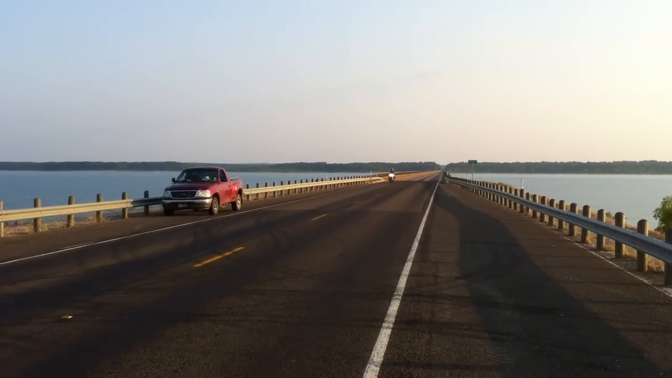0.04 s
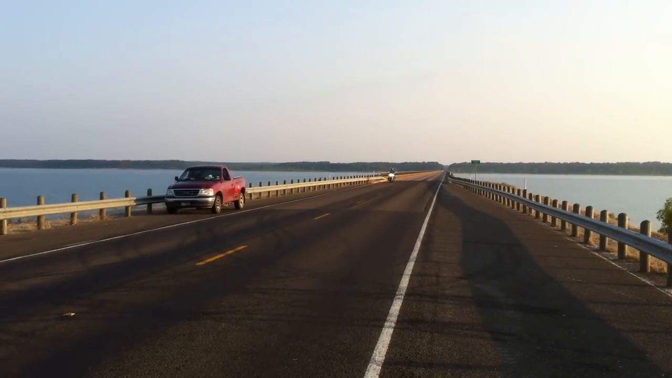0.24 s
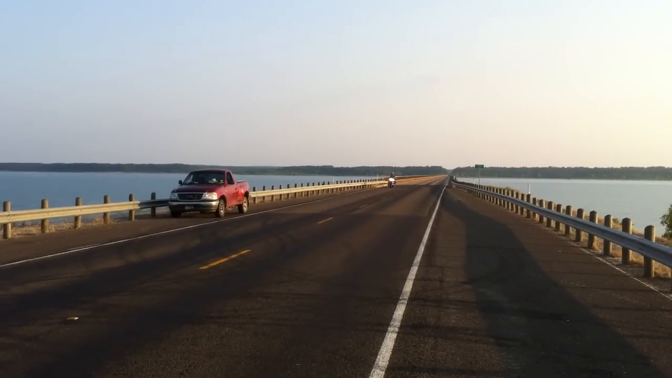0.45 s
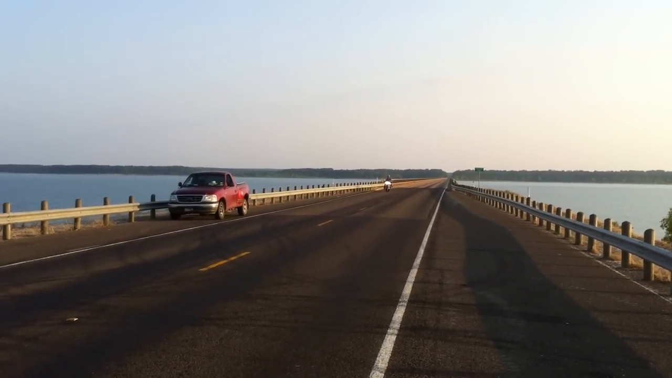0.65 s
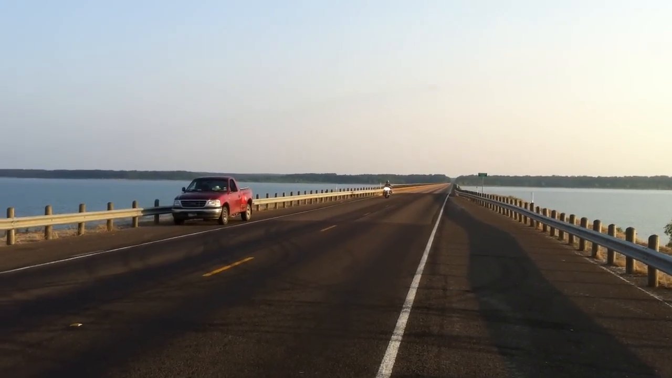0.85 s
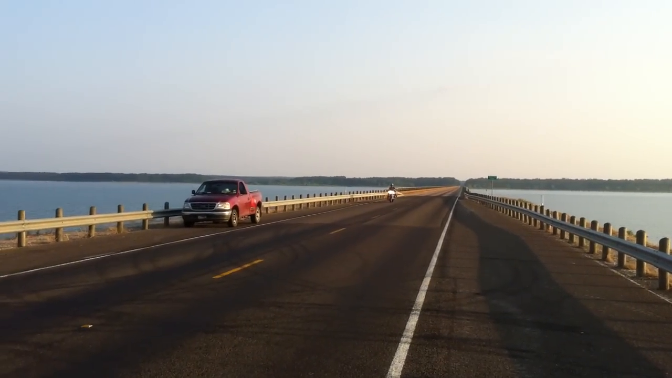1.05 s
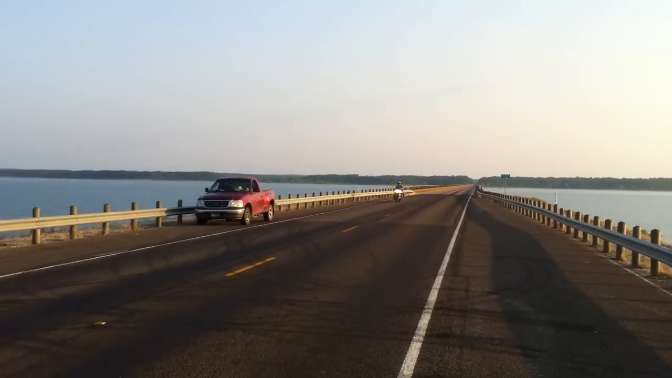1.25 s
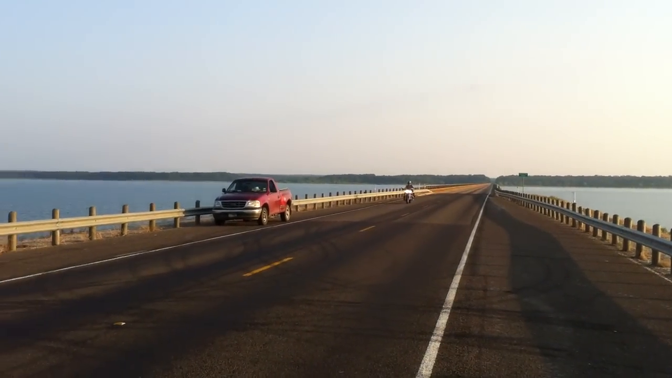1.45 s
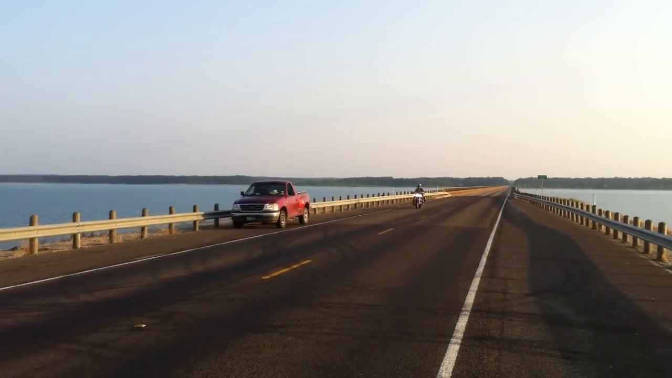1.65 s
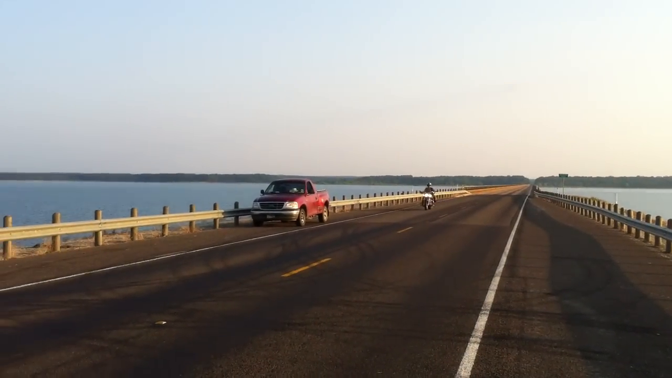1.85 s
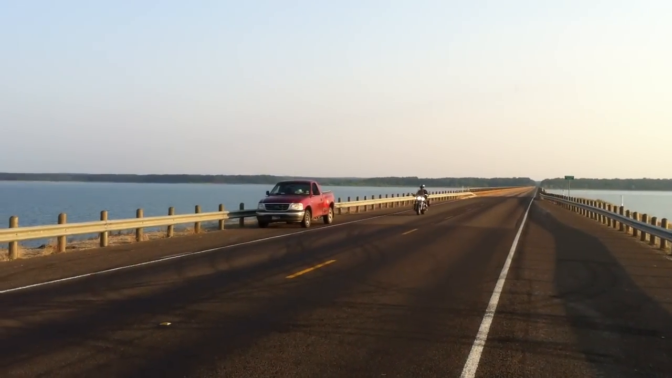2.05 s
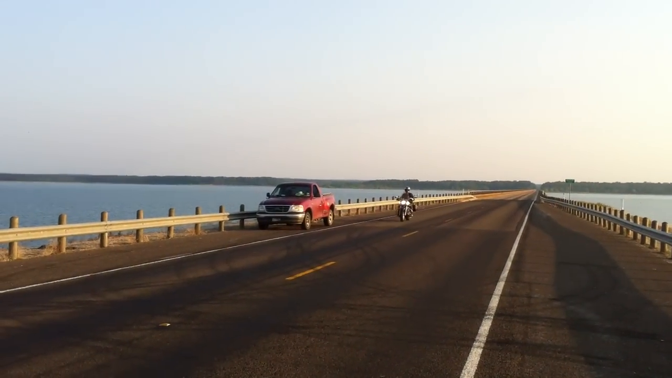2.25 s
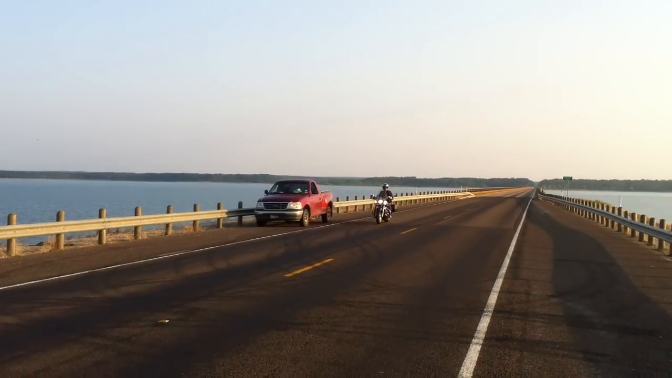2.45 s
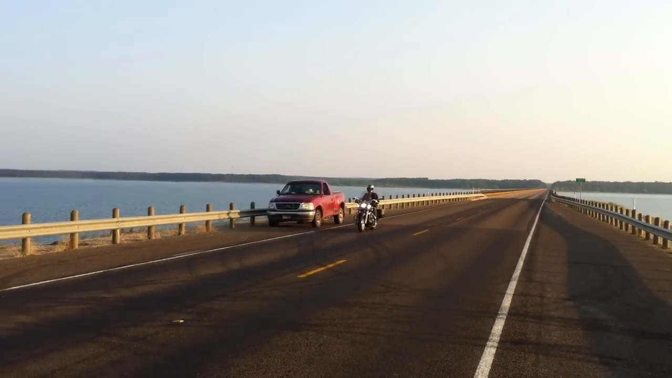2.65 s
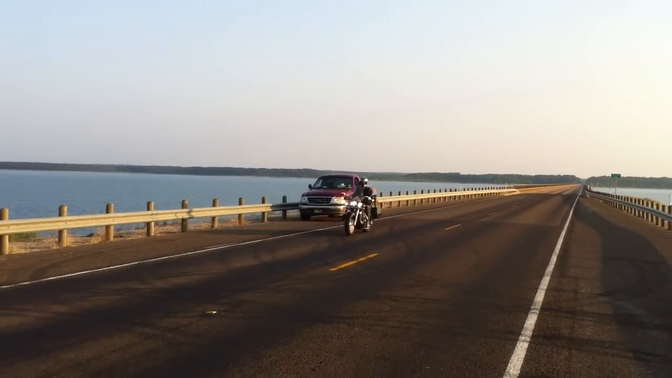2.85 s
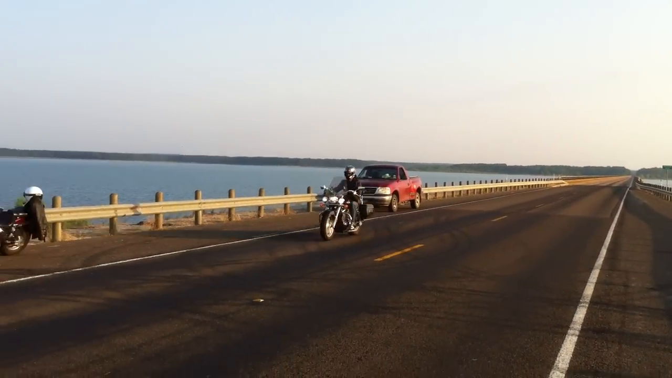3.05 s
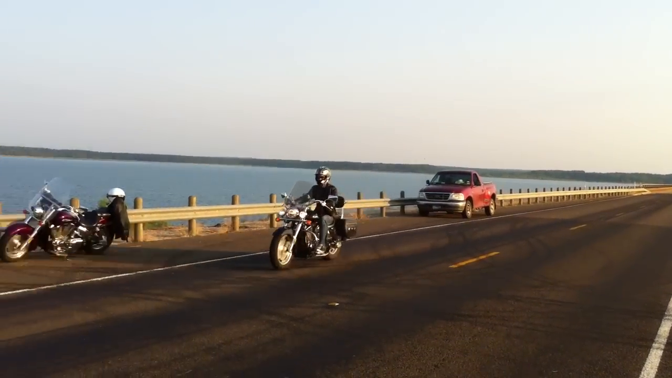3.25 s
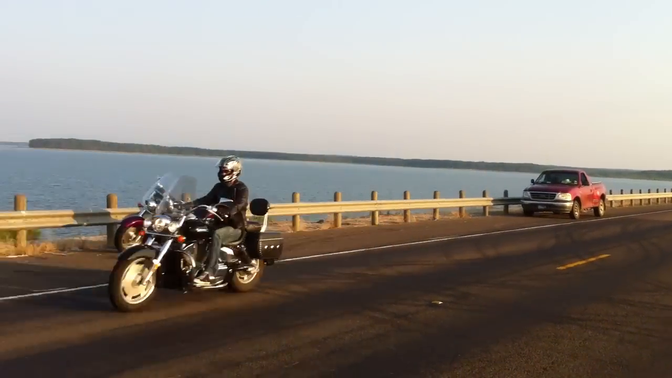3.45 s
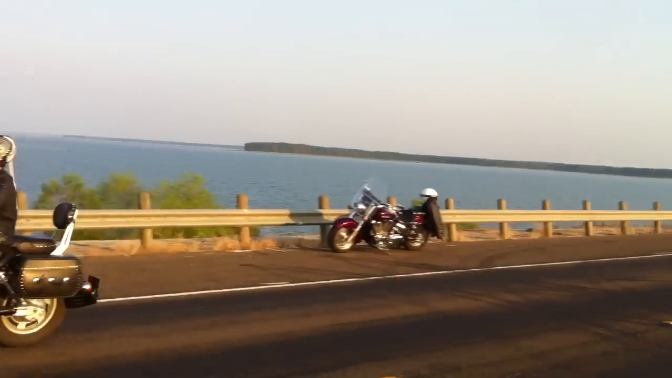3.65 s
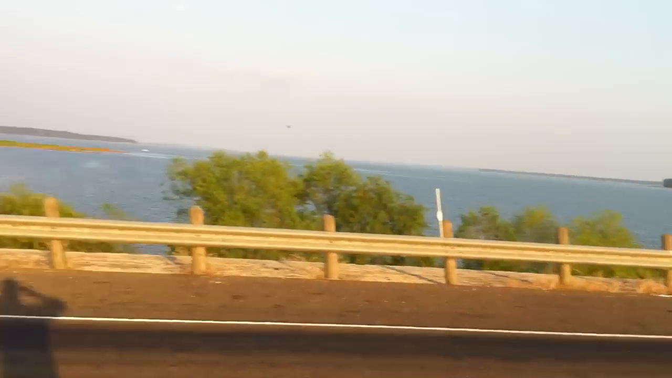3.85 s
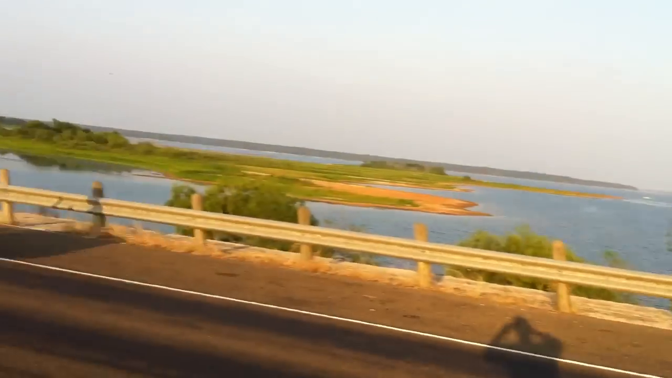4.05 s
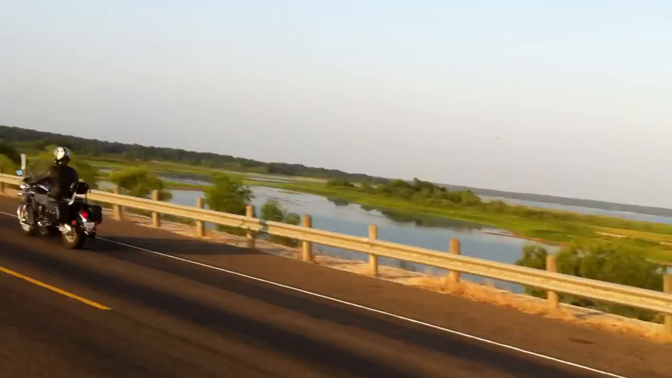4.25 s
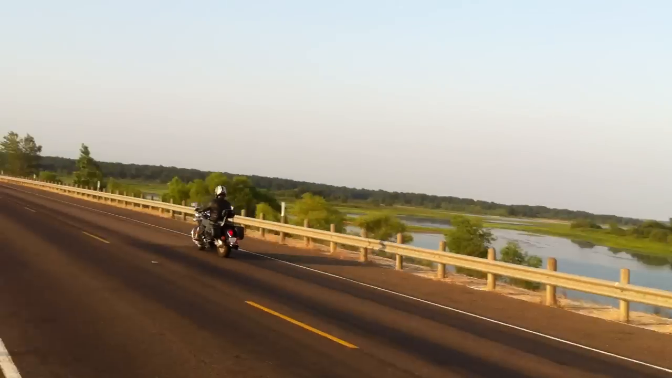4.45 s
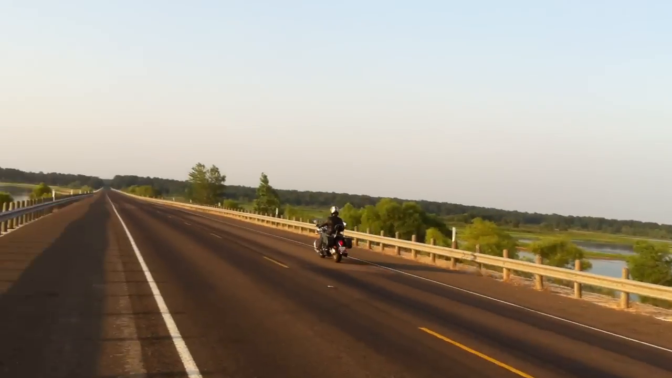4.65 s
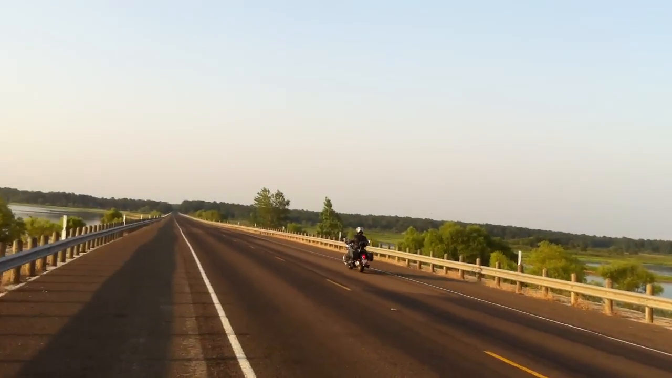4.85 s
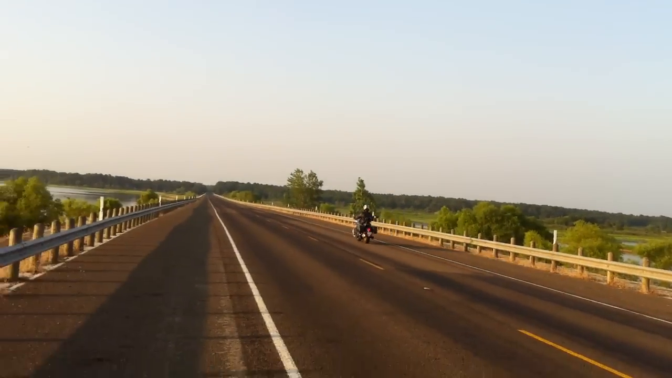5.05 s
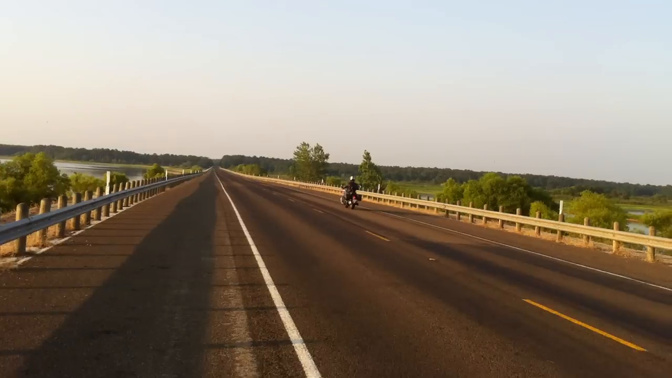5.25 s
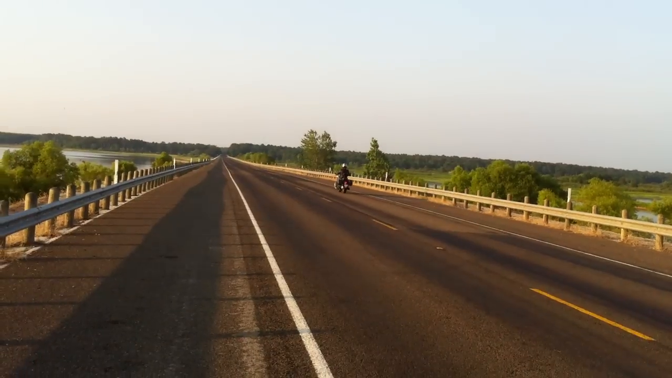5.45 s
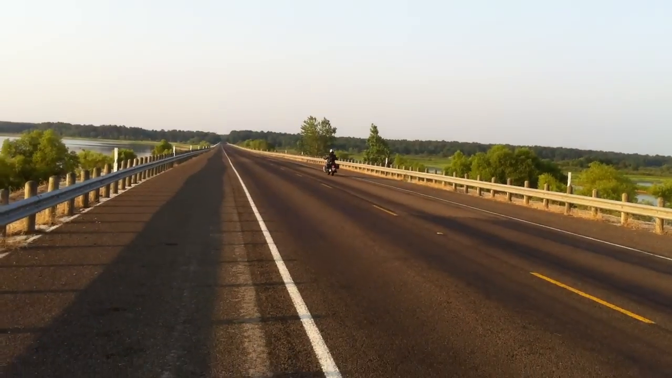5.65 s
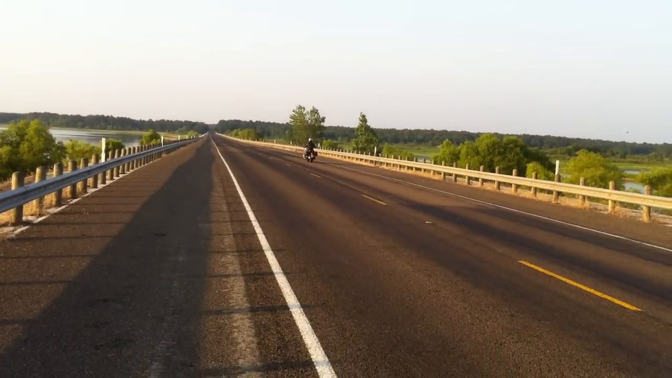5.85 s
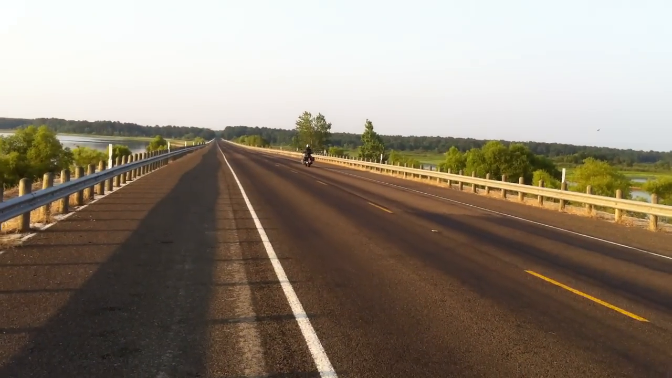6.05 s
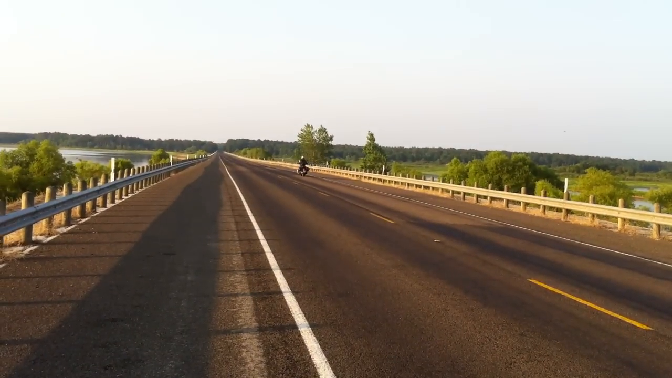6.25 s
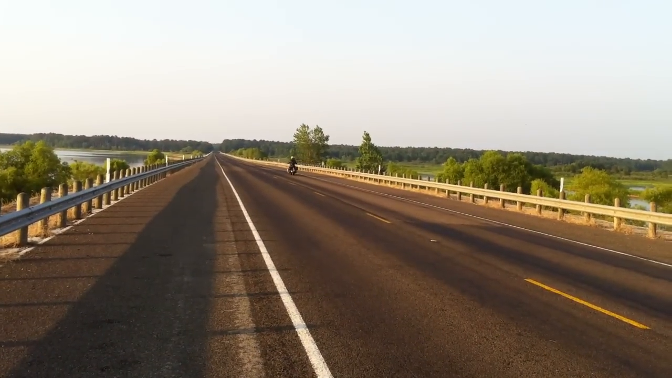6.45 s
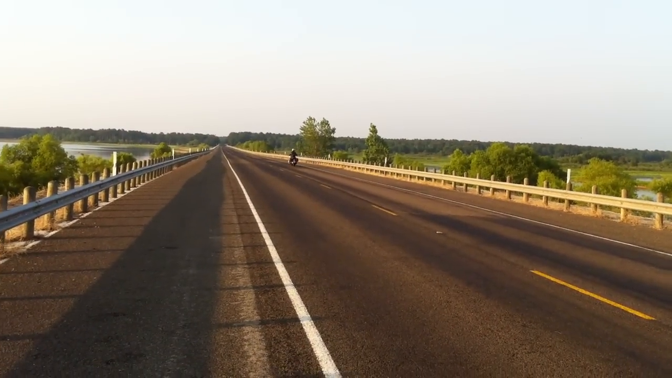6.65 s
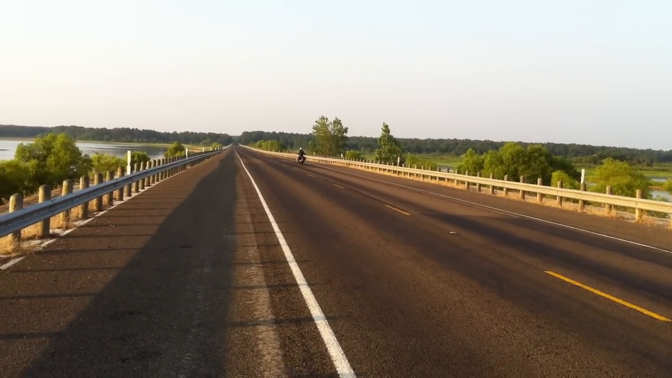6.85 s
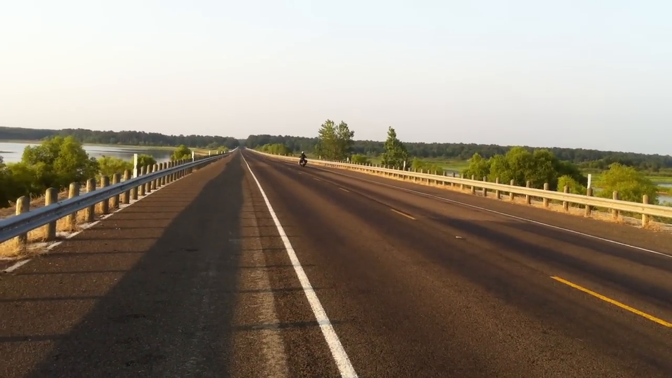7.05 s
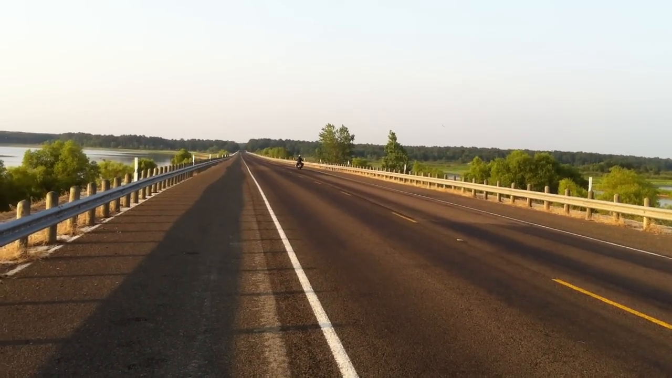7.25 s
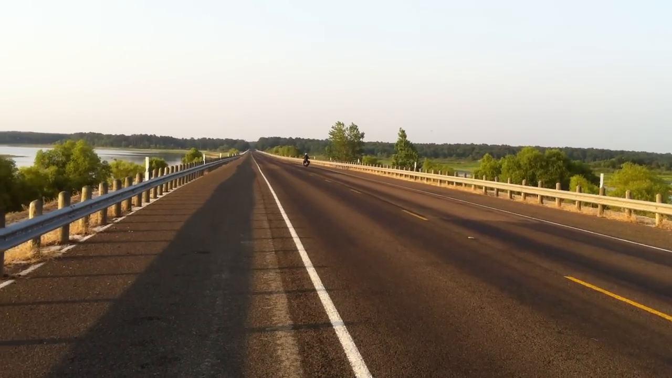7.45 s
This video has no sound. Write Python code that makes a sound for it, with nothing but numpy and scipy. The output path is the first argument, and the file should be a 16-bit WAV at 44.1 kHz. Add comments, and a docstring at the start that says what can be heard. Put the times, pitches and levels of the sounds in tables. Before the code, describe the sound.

A twin-cylinder motorcycle with a loud exhaust approaches on an open road, its uneven throb joined by engine clatter and a building roar. About four seconds in it passes close to the roadside microphone with a brief whine and a rush of tyre hiss, and the pitch drops. It rides away crackling and growling, slowly fading. A light breeze touches the microphone.

```python
"""A V-twin motorcycle with open pipes passes a phone on a causeway at highway speed.
Approach: over a light breeze, two uneven firings a cycle ring two pipes; valves knock, gears rattle,
a rough roar builds. Pass, near 4 s: a brief whine, tyre hiss and a low rumble swell, the pitch drops.
Departure: the pipe mouths face the listener, each firing cracks, a growl trails, the rumble fades.
Guard rails scatter the bike's sound throughout."""
import sys
import numpy as np
from scipy import signal
from scipy.fft import rfft, irfft
from scipy.io import wavfile
from scipy.ndimage import uniform_filter1d, map_coordinates

SR = 44100
rng = np.random.default_rng(int(sys.argv[2]) if len(sys.argv) > 2 else 0)


def unload_wav(signal):
    """Save mono or channel-first audio to the path in sys.argv[1] as 16-bit WAV at rate SR, clipped to [-1, 1]."""
    wavfile.write(
        sys.argv[1],
        SR,
        np.round(np.clip(np.atleast_2d(signal).T, -1, 1) * 32767).astype(np.int16),
    )


N = 330750
TIME = np.arange(N) / SR

# engine speed: t/s, cycle rate/Hz
ENGINE_SPEED = [(0, 25.498), (2.2, 25.586), (5.2, 25.567), (7.5, 25.829)]
# pipe spectra: f/Hz, level/dB of pipe 1 ahead, pipe 2 ahead, pipe 1 behind, pipe 2 behind
PIPE_SPECTRA = [(63.3, -64, -62.5, -47, -54), (108, -28.5, -46, -40, -46.5), (150.2, -8, -2.5, -10, -4.5),
                (160.8, -6, -6.5, -9.5, -11), (179, -17, -19, -16.5, -15.5), (280.3, -11.5, -6, -7.5, -2.5),
                (330.2, -21, -29, -12, -16.5), (431, -27, -26, -25, -15), (475, -40, -27.5, -57.5, -26.5),
                (675, -11.5, -21, -55.5, -31.5), (697, -44.5, -9, -27, -20.5),
                (878, -46.5, -32, -14.5, -45.5), (1120, -50, -36.5, -33.5, -30.5),
                (1660, -52.5, -41.5, -39.5, -30.5)]
# round trip, one row a pipe: delay/s, share
PIPE_ECHO = [(.0064, .58), (.0131, .25)]
# upper pipe modes: f/Hz, width/Hz, level ahead/dB, level behind/dB
PIPE_MODES = [(463, 24.6, -22, -19.5), (583.5, 26, -11, -20), (670, 61, -22, -32), (769.8, 5.7, -19, -11.5),
              (846.4, 11.3, -11.5, -13.5)]
# gain of the boom's upper band: t/s, level/dB
HONK = [(0, 0), (.8, 2), (1.5, -2.5), (2.2, -0.5), (2.6, -2), (2.95, 2), (3.5, 4), (3.76, 2.5), (4.03, 8),
        (4.2, 2.5), (4.4, 2), (7.5, .5)]
# ordinary cracks: t/s, pop level/dB, ring level/dB, snap level/dB
USUAL_CRACKS = [(0, -56, -80, -90), (3.2, -36.5, -43.5, -67), (3.7, -28, -45, -56),
                (3.95, -28, -36.5, -47.5), (4.2, -22, -30, -41.5), (4.5, -29.5, -30.5, -34.5),
                (5.4, -27, -32.5, -34.5), (6.4, -32, -34, -36.5), (6.8, -33.5, -32, -42.5),
                (7.5, -31.5, -41, -41)]
# hardest cracks: t/s, pop level/dB, ring level/dB, snap level/dB, bite f/Hz
HARD_CRACKS = [(3.809, -23, -48, -49, 1900), (4.083, -18.5, -32, -44, 1570), (4.123, -23, -25, -40, 4700),
               (4.164, -21, -27.5, -42, 1710), (4.246, -21.5, -23, -39, 3770),
               (4.287, -23.5, -28, -36, 1770), (4.328, -21, -24.5, -32.5, 1530),
               (4.411, -25.5, -28, -33, 2150), (4.453, -30, -26, -27, 5600), (4.494, -23, -30, -29.5, 1810),
               (4.536, -18.5, -26, -30, 1790), (4.619, -28, -31.5, -29.5, 8250),
               (4.661, -23.5, -26, -27.5, 6850), (4.702, -22, -28.5, -25, 7410),
               (4.744, -22, -35, -37, 1480), (4.786, -26, -18.5, -26, 3730), (4.828, -20.5, -31, -38, 1520),
               (4.953, -24.5, -28, -38, 1620), (5.036, -26, -28, -22.5, 6570), (5.161, -24, -29, -28, 7400),
               (5.495, -25, -25.5, -25.5, 6760), (5.579, -21, -36, -32.5, 1490),
               (5.621, -22.5, -41, -28, 7600), (5.662, -22, -37, -29, 1490), (5.746, -23.5, -38, -36, 1410),
               (5.871, -39, -24.5, -31, 3790), (5.912, -32, -27, -39, 3660),
               (6.079, -27.5, -29.5, -34, 1440), (6.246, -28.5, -28.5, -34, 3520),
               (6.329, -26.5, -25.5, -33, 4090), (6.454, -29, -26, -38, 3700),
               (6.495, -31, -29.5, -40, 4380), (6.537, -26.5, -29, -48, 3900),
               (6.578, -31, -23.5, -39, 3680), (6.703, -26, -29, -32, 3950), (6.744, -30, -27.5, -33, 3820),
               (6.786, -29, -24.5, -36, 3680), (6.827, -26, -23.5, -40, 3700),
               (6.869, -28, -24.5, -33.5, 3750), (6.91, -27.5, -29, -37, 3470),
               (6.952, -30, -29, -38, 4550), (7.159, -30.5, -29, -36, 3350)]
# spectra of pop, ring and snap, each: f/Hz, level/dB
CRACK_SPECTRA = [
    [(500, -7.5), (1000, 6.5), (1500, 9), (2200, 5), (2900, -8), (4000, -21), (8000, -51)],
    [(1500, -34), (2800, -9.5), (3700, 6.5), (4800, -4), (5600, -20), (8000, -37)],
    [(3500, -30), (5500, -8.5), (6600, 5.5), (8000, 2.5), (9300, -13), (11000, -4), (12600, -13.5),
     (13700, -6), (16000, -13)],
]
# piston and valve knocks: phase/cycles, level/dB
KNOCKS = [(.02, -1), (.13, 4), (.43, -5), (.49, -3), (.61, -5), (.75, 0)]
# engine case ring: f/Hz, level ahead/dB, level abreast/dB, level behind/dB
CASE_SPECTRA = [(200, -28, -23, -23), (472, -6, -7.5, -4.5), (680, 6, 1, -3.5), (953, 3.5, -9.5, 4.5),
                (1086, -1, -1, -3), (1196, -12, 7, 4), (1320, 4, -8.5, -1), (1590, -2, -1, 1.5),
                (1790, -2, 3, -7), (1890, -16, -2.5, -6.5), (2135, -3, -7.5, -13.5), (2357, -5.5, -8, -7),
                (2610, -17.5, -6, -29), (2700, -13, -16.5, -15), (3220, -21.5, -26, -22.5),
                (3420, -12, -18, -13), (3940, -38, -24, -16.5), (7000, -40.5, -48, -59.5)]
# roar of the approach: t/s, f/Hz, level/dB
ROAR = [(2.45, 890, -47), (2.57, 880, -31), (2.75, 760, -32), (3.15, 730, -27.5), (3.45, 835, -31.5),
        (3.72, 790, -28.5), (3.82, 820, -37), (4.0, 810, -30), (4.17, 750, -38)]
# whine of the engine's flank: t/s, f/Hz, level/dB
WHINE = [(3.1, 2340, -40), (3.68, 2180, -43), (3.8, 1970, -28), (3.88, 1940, -40), (4.1, 1870, -38)]
# growl of the pipe mouths: t/s, f/Hz, level/dB
GROWL = [(3.8, 1010, -40), (3.92, 950, -26.5), (4.06, 944, -30.5), (4.15, 940, -42), (4.45, 923, -32),
         (5.35, 887, -31.5), (6.11, 872, -38.5), (6.25, 850, -31.5), (6.7, 878, -39.5), (7.5, 872, -35)]
# tyre and air hiss along the road: f/Hz, level/dB
HISS_AXIAL = [(3100, 3.5), (3700, 8.5), (4700, -5), (5600, -5.5), (6600, 1), (8200, -13), (9600, -9.5),
              (11000, -18), (11800, -42), (15500, -19)]
# whoosh abreast: f/Hz, level/dB
HISS_SIDE = [(1200, 5.5), (2400, 1), (3800, 2), (5500, -4), (6700, -7), (8200, -6.5), (9900, -11),
             (11000, -10), (11900, -15), (13000, -16)]
# rail scatter, long waves bend round the posts: f/Hz, level/dB
RAIL_SPECTRUM = [(100, -12), (300, 2), (600, 12.5), (2500, 4), (4000, 4), (6500, -1), (14000, -42)]
# wind on the microphone and low rumble: f/Hz, level/dB
WIND_SPECTRUM = [(15, -17), (30, -38), (60, -5), (100, 4), (160, -11), (400, -38), (1500, -81)]
# puffs on the microphone: t/s, level/dB
PUFFS = [(.77, -52), (1.1, -50), (1.5, -46), (2.1, -49), (2.27, -52), (3.31, -49), (3.46, -52), (3.77, -54)]
# open air: f/Hz, level/dB
AIR_SPECTRUM = [(100, -10), (1000, -3), (4000, -10), (8000, -16.5), (16000, -33.5)]

# settings for carry_db(); losses per doubling of distance, negative if beamed down the road
BOOM = dict(ahead_db=-9, behind_db=-16, ahead_loss_db=9, behind_loss_db=2.5, broadside_db=1.16)
BARK = dict(ahead_db=-18, behind_db=-32.5, ahead_loss_db=9.5, behind_loss_db=-1.5, broadside_db=11)
CLATTER = dict(ahead_db=-26.5, behind_db=-28.5, ahead_loss_db=7, behind_loss_db=5, broadside_db=2.5)
HISS = dict(ahead_db=-25, behind_db=-34.5, ahead_loss_db=20, behind_loss_db=24, broadside_db=10)

CYCLE_HZ, FIRING_PHASES = 25.7, (0, .403)
SPEED_M_S, PASS_S, LANE_M, SOUND_M_S = 23.74, 3.9515, 6.01, 343


def firings(phase, scatter_db=.5, jitter_s=.00003, count=200):
    """One cylinder's pulses in the bike's own time, slightly uneven."""
    chance = rng.standard_normal((count, 2))
    at = ((np.arange(count) + phase) / CYCLE_HZ + jitter_s * chance[:, 1]) * SR
    pulses = np.zeros(int((count + 1) / CYCLE_HZ * SR))
    pulses[np.abs(at).astype(int)] = undb(scatter_db * chance[:, 0])
    return pulses


def pipes():
    """Firings echo in two pipes and ring their modes; returns the sound ahead and behind."""
    hz, *spectra_db = np.transpose(PIPE_SPECTRA)
    ahead, behind, drive = 0, 0, 0
    for k, (phase, (delay_s, share)) in enumerate(zip(FIRING_PHASES, PIPE_ECHO)):
        pulses = firings(phase)
        drive = drive + pulses
        echoed = pulses + share * np.roll(pulses, int(delay_s * SR))
        ahead = ahead - colour(echoed, np.c_[hz, spectra_db[k]])
        behind = behind - colour(echoed, np.c_[hz, spectra_db[k + 2]])
    for mode_hz, width_hz, ahead_db, behind_db in PIPE_MODES:
        ring = signal.lfilter(*signal.iirpeak(mode_hz, mode_hz / width_hz, fs=SR), drive)
        ahead, behind = ahead + undb(ahead_db) * ring, behind + undb(behind_db) * ring
        drive = -drive  # adjacent modes are in antiphase at the mouth
    return ahead, behind


def exhaust(cycles, top_hz=1410, split_hz=471, honk_hz=368):
    """The moving pipes, Doppler-shifted: a low boom and a higher bark."""
    ahead, behind = pipes()
    _, _, facing, _ = ride()
    boom, bark = 0, 0
    for view, share in ((ahead, 1 - facing), (behind, facing)):
        heard = map_coordinates(low(view, top_hz, order=3), [cycles / CYCLE_HZ * SR], order=1)
        bass = low(heard, split_hz, order=6)
        boom, bark = boom + share * unit(bass), bark + share * unit(heard - bass)
    deep = low(boom, honk_hz)
    boom = deep + (boom - deep) * undb(np.interp(TIME, *np.transpose(HONK)))
    bark = bark / np.hypot(facing, 1 - facing)  # views add in power
    flutter_db = .33 * walk(9.7)  # moving air
    shadow_db = 16.5 * bell(facing, .32, .17)  # the bike's body hides the mouths
    return boom * undb(carry_db(**BOOM)) + bark * undb(carry_db(**BARK) - shadow_db + flutter_db)


def crack(levels_db, bite_hz, distance_m, stretch, size, rise_s=.0012, tail_s=.005, rms_s=.005):
    """One burst of gas: pop, metallic ring and snap, with a resonance at bite_hz."""
    age_s = TIME[:size]
    envelope = (age_s / rise_s * np.exp(1 - age_s / rise_s)) ** 2 + .2 * np.exp(-age_s / tail_s)
    hz = np.geomspace(300, 20000, 60)
    bite_db = 9.5 * bell(np.log2(hz / bite_hz), 0, .14)
    ragged_db = 4.2 * rng.standard_normal(len(hz))
    air_loss_db = .16 * distance_m * (hz / 10000) ** 2
    lookup_hz = hz / stretch ** np.clip(np.log2(hz / 2200), 0, 1)  # only the treble sweeps
    burst = rng.standard_normal(size) * envelope
    burst[np.argmax(envelope)] -= 3.3  # steep pressure front
    out = 0
    for spectrum, level_db in zip(CRACK_SPECTRA, levels_db):
        part_hz, part_db = np.transpose(spectrum)
        shape_db = np.interp(np.log(lookup_hz), np.log(part_hz), part_db)
        part = colour(burst, np.c_[hz, shape_db + bite_db + ragged_db - air_loss_db], size=size)
        out = out + part * undb(level_db) * np.sqrt(rms_s * SR) / np.linalg.norm(part)
    return out


def cracks(cycles, scatter_db=2.6, usual_bite_hz=3970, scatter_octaves=.7, size=1024):
    """A crack at each firing, beamed rearward; the hardest come from cylinder 1."""
    hard_s, *hard_db, hard_hz = np.transpose(HARD_CRACKS)
    hard_cycles = np.round(np.interp(hard_s, TIME, cycles))
    hard = dict(zip(hard_cycles, zip(np.transpose(hard_db), hard_hz)))
    usual_s, *usual_db = np.transpose(USUAL_CRACKS)
    _, distance_m, _, _ = ride()
    stretch, out = treble_sweep(), np.zeros(N + size)
    for cycle in range(1, int(cycles[-1]) + 1):
        for phase in FIRING_PHASES:
            at = np.searchsorted(cycles, cycle + phase)
            if at == N:
                break
            levels_db = np.array([np.interp(TIME[at], usual_s, db) for db in usual_db])
            levels_db += scatter_db * rng.standard_normal(3)
            bite_hz = usual_bite_hz * 2 ** (scatter_octaves * rng.standard_normal())
            if phase:
                levels_db += (-8, -6.5, -4)  # cylinder 2 is weaker
            elif cycle in hard:
                levels_db, bite_hz = hard[cycle]
            out[at:at + size] += crack(levels_db, bite_hz, distance_m[at], stretch[at], size)
    return out[:N]


def clatter(cycles, knock_s=.00078, knock_gain=1.52, scatter_db=2):
    """Piston and valve knocks and partly cyclic gear rattle ring the engine cases."""
    along_m, _, facing, broadside = ride()
    spread_db = scatter_db * rng.standard_normal((int(cycles[-1]) + 2, len(KNOCKS)))
    knocks = 0
    for k, (phase, db) in enumerate(KNOCKS):
        count = cycles + 1 - phase
        age_s = (count % 1) / CYCLE_HZ
        knocks = knocks + undb(db + spread_db[count.astype(int), k]) * np.exp(-age_s / knock_s)
    repeat = .44 + .47 * broadside
    rattle = (rng.standard_normal(N) + repeat * cycle_pattern(cycles)) / np.hypot(1, repeat)
    drive = rattle * (1 + knock_gain * knocks)
    hz, *views_db = np.transpose(CASE_SPECTRA)
    side = broadside ** 4
    shares = (1 - side) * (1 - facing), side, (1 - side) * facing
    heard = sum(share * unit(colour(drive, np.c_[hz, db])) for share, db in zip(shares, views_db))
    rasp_db = 4.5 * bell(along_m, -14, 12.7)  # front quarter in view
    return unit(heard) * undb(carry_db(**CLATTER) + rasp_db + .47 * walk(12))


def rough_resonance(cycles, curve, width_hz, roughness=1.1, fade_db_per_s=57):
    """A gliding noise band shaken by the firings; fades outside its curve's time span."""
    t_s, hz, db = np.transpose(curve)
    carrier = np.exp(2j * np.pi * np.cumsum(np.interp(TIME, t_s, hz)) / SR)
    drive = (cycle_pattern(cycles) + roughness * rng.standard_normal(N)) * (1 + 2.6 * throb(cycles))
    ring = carrier * signal.sosfilt(signal.butter(2, width_hz / 2, fs=SR, output="sos"), drive / carrier)
    outside_s = np.abs(TIME - np.clip(TIME, t_s[0], t_s[-1]))
    return unit(ring.real) * undb(np.interp(TIME, t_s, db) - fade_db_per_s * outside_s)


def hiss(cycles):
    """Tyres and rushing air; a gusty, phasing whoosh when abreast."""
    _, _, _, broadside = ride()
    side = broadside ** 3
    air = np.sqrt(1 - side) * noise(HISS_AXIAL) + np.sqrt(side) * noise(HISS_SIDE)
    swept = map_coordinates(air, [np.cumsum(treble_sweep())], order=5, mode="mirror")
    level_db = carry_db(**HISS) + .37 * walk(7.8) + 1.1 * walk(97)
    return unit(swept * (1 + .55 * throb(cycles))) * undb(level_db)


def rails(x, gain_db=-14.5, t60_s=.27, gap_s=.006, paths=4):
    """Guard rail posts return a dull, diffuse tail; its paths change as the bike moves."""
    age_s = TIME[:SR // 2]
    decay = np.exp(-np.log(1000) * age_s / t60_s) * (age_s > gap_s)
    scattered, out = colour(x, RAIL_SPECTRUM), 0
    for _ in range(paths):
        tail = rng.standard_normal(len(age_s)) * decay
        out = out + walk(24) * signal.fftconvolve(scattered, tail / np.linalg.norm(tail))[:N]
    return out * undb(gain_db) / np.sqrt(paths)


def wind_and_rumble(breeze_db=-64, rumble_db=-53, rise_s=.22, fade_db_per_s=3.5, air_db=-63.5):
    """Breeze and puffs on the microphone, faint air; a low rumble swells at the pass and slowly fades."""
    since_s = TIME - PASS_S
    rumble = undb(rumble_db - fade_db_per_s * np.maximum(since_s, 0))
    rumble *= np.exp(np.minimum(since_s, 0) / rise_s)
    puffs = sum(undb(db) * bell(TIME, t_s, width=.047) for t_s, db in PUFFS)
    strength = (undb(breeze_db) + rumble) * undb(2 * walk(7.3)) + puffs
    return strength * noise(WIND_SPECTRUM) + undb(air_db) * noise(AIR_SPECTRUM)


def ride():
    """Straight, steady ride: position/m, distance/m, pipes facing the listener (0-1), broadside (0-1)."""
    along_m = SPEED_M_S * (TIME - PASS_S)
    distance_m = np.hypot(along_m, LANE_M)
    return along_m, distance_m, .5 + np.arctan(along_m / LANE_M) / np.pi, LANE_M / distance_m


def carry_db(ahead_db, behind_db, ahead_loss_db, behind_loss_db, broadside_db, near_m=21.03):
    """Level by distance and direction; distance loss flattens within near_m."""
    along_m, _, facing, broadside = ride()
    doublings = np.log2(np.hypot(along_m, near_m) / near_m)
    front_db = ahead_db - ahead_loss_db * doublings
    rear_db = behind_db - behind_loss_db * doublings
    return (1 - facing) * front_db + facing * rear_db - broadside_db * broadside


def cycles_heard(start_phase=.678):
    """Running count of engine cycles at the listener, with Doppler shift."""
    along_m, distance_m, _, _ = ride()
    doppler = 1 / (1 + SPEED_M_S / SOUND_M_S * along_m / distance_m)
    return start_phase + np.cumsum(np.interp(TIME, *np.transpose(ENGINE_SPEED)) * doppler) / SR


def throb(cycles, decay_cycles=.028):
    """Envelope that jumps at each firing."""
    return sum(np.exp(-((cycles - phase) % 1) / decay_cycles) for phase in FIRING_PHASES)


def cycle_pattern(cycles, size=1536):
    """Noise that repeats every engine cycle."""
    return unit(np.interp(cycles, np.arange(size) / size, rng.standard_normal(size), period=1))


def treble_sweep(rise=.27, after_m=3, width_m=10):
    """Frequency factor: treble peaks and notches rise and fall at the pass."""
    along_m, _, _, _ = ride()
    return 1 + rise * bell(along_m, after_m, width_m)


def undb(db):
    """Decibels to gain."""
    return 10 ** (np.asarray(db) / 20)


def unit(x):
    """Scale to rms 1."""
    return x / np.sqrt(np.mean(x ** 2))


def bell(x, centre, width):
    """Gaussian of height 1."""
    return np.exp(-((x - centre) / width) ** 2)


def colour(x, points, size=16384):
    """Minimum-phase filter through points of f/Hz, level/dB."""
    hz, db = np.transpose(points)
    bins_hz = np.maximum(np.arange(size // 2 + 1) * SR / size, 1)
    cepstrum = irfft(np.log(undb(np.interp(np.log(bins_hz), np.log(hz), db))))
    cepstrum[1:size // 2] *= 2
    cepstrum[size // 2 + 1:] = 0
    impulse = irfft(np.exp(rfft(cepstrum)))[:size // 2]
    return signal.fftconvolve(x, impulse)[:len(x)]


def noise(points):
    """Coloured noise, rms 1."""
    return unit(colour(rng.standard_normal(N), points))


def low(x, hz, order=4):
    """Zero-phase low-pass."""
    return signal.sosfiltfilt(signal.butter(order, hz, fs=SR, output="sos"), x)


def walk(rate_hz):
    """Random steps, smoothed twice; spread near 1."""
    hold = int(SR / rate_hz)
    steps = np.repeat(rng.standard_normal(N // hold + 1), hold)
    return 1.09 * uniform_filter1d(uniform_filter1d(steps, hold), hold)[:N]


def scene():
    """Bike, rail echoes, wind and rumble; mono."""
    cycles = cycles_heard()
    bike = exhaust(cycles)
    bike += rough_resonance(cycles, ROAR, width_hz=246)
    bike += rough_resonance(cycles, WHINE, width_hz=220)
    bike += clatter(cycles)
    bike += rough_resonance(cycles, GROWL, width_hz=79)
    bike += hiss(cycles)
    crackle = cracks(cycles)
    echoes = rails(bike + undb(-.5) * crackle)  # beamed cracks reach the rails less
    return (bike + crackle + echoes + wind_and_rumble())[None]


def record(dry, top_hz=16000):
    """The phone rounds peaks near full scale and cuts the top."""
    limited = dry / (1 + dry ** 8) ** (1 / 8)
    return signal.sosfilt(signal.ellip(8, .2, 70, top_hz, fs=SR, output="sos"), limited)


dry = scene()
out = record(dry)
unload_wav(out)
```